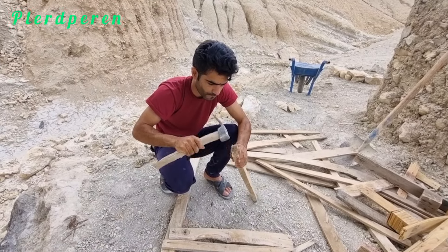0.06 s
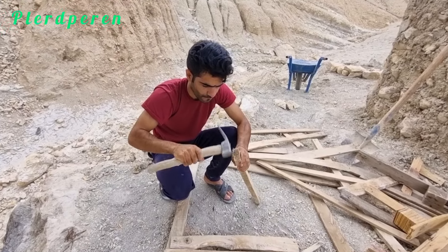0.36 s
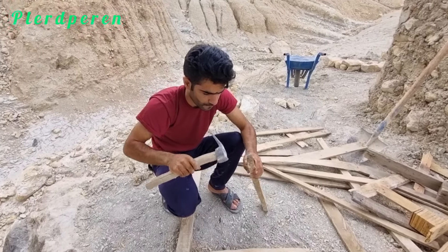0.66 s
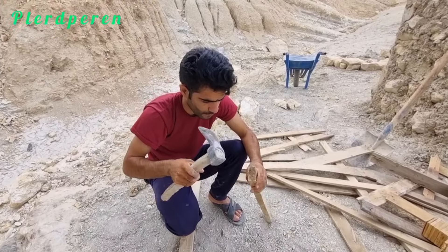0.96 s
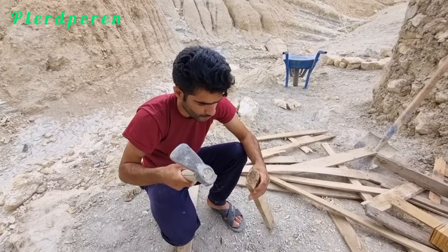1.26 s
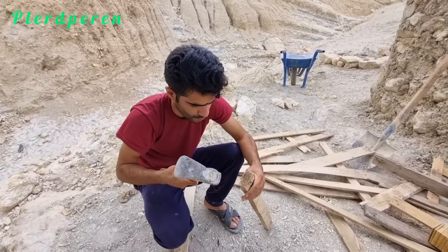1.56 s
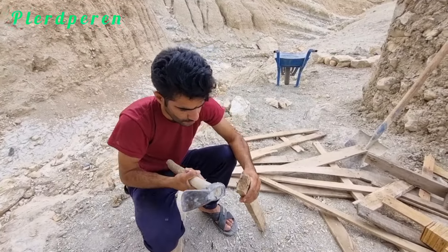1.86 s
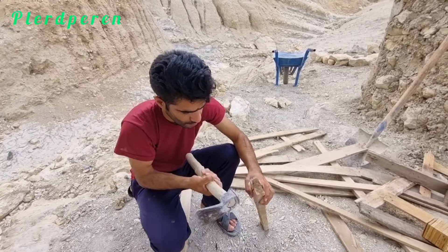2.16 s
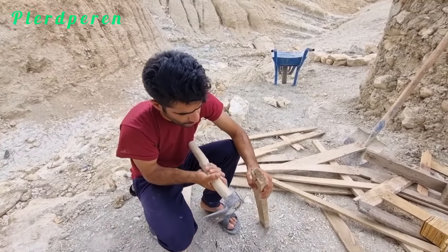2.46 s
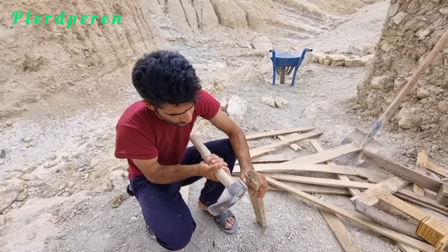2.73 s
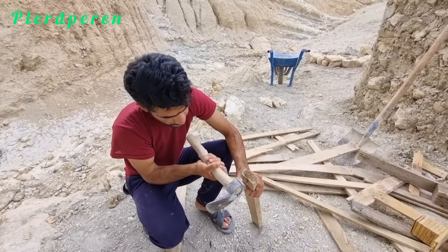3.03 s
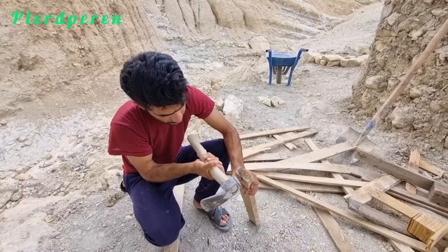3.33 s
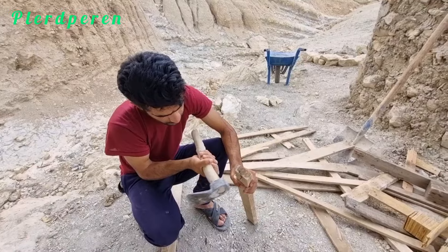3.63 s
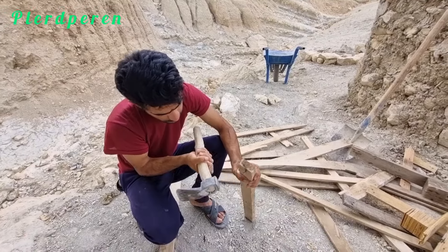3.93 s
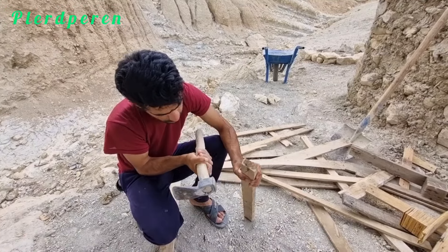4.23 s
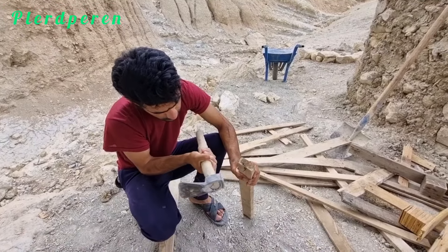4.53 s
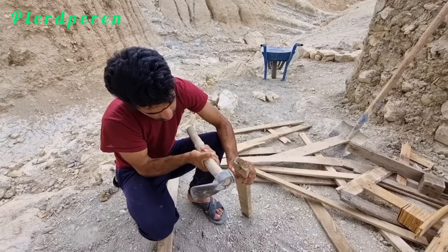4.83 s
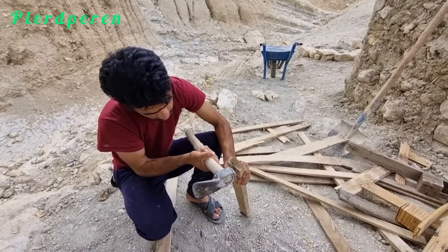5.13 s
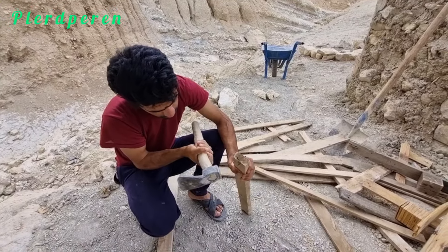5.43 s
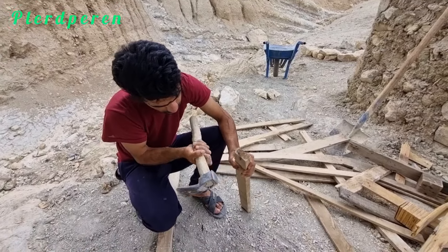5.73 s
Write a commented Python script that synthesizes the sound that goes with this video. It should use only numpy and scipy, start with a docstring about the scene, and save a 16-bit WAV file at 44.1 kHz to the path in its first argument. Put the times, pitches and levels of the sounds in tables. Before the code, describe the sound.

A hatchet chops a wooden stake, once early, then in a steady run of dry knocks, over a faint outdoor breeze.

```python
"""In a dry ravine, about two metres away, a hatchet chops at a wooden stake held upright on stony ground.
The edge bites, fibres crack, the stake rings and thumps into the soil; after some chops it knocks again.
Ground and lumber scatter each blow, chips and grit land, and the slopes return a faint tail.
Wood slides in the hands between blows, and a breeze rumbles under a thin hiss."""
import sys
import numpy as np
from scipy import signal
from scipy.fft import rfft, irfft, next_fast_len
from scipy.io import wavfile

SR = 44100
rng = np.random.default_rng(int(sys.argv[2]) if len(sys.argv) > 2 else 0)


def generate_wav(sig):
    """Save sig (samples, or channels by samples) to the path in sys.argv[1] as 16-bit PCM at SR."""
    pcm = np.round(np.clip(np.atleast_2d(sig).T, -1, 1) * 32767).astype(np.int16)
    wavfile.write(sys.argv[1], SR, pcm)


N = 255339
HIT_SAMPLES = 20000  # one hit with its tail
TIME, AGE = np.arange(N) / SR, np.arange(HIT_SAMPLES) / SR  # seconds into the scene, into a hit


def undb(db):
    """Decibels to gain."""
    return 10 ** (np.asarray(db) / 20)


def unit_rms(x):
    """Scale to rms 1."""
    return x / np.sqrt(np.mean(x ** 2))


def unit_energy(x):
    """Scale to an average energy of 1 per channel."""
    return unit_rms(x) / np.sqrt(x.shape[-1])


def on_log(hz, points):
    """Read (Hz, value) points on a log-frequency axis."""
    point_hz, values = np.transpose(points)
    return np.interp(np.log(np.maximum(hz, 1)), np.log(point_hz), values)


def eq(x, points):
    """Minimum-phase EQ through (Hz, dB) points."""
    size = 2 * next_fast_len(x.shape[-1])
    hz = np.arange(size // 2 + 1) * SR / size
    cepstrum = irfft(np.log(undb(on_log(hz, points))))
    cepstrum[1:size // 2] *= 2
    cepstrum[size // 2 + 1:] = 0
    return irfft(rfft(x, size) * np.exp(rfft(cepstrum)))[..., :x.shape[-1]]


def boost(x, hz, lift_db, width):
    """Peak EQ round one frequency; width is a share of that frequency."""
    return eq(x, [(hz / (1 + width), 0), (hz, lift_db), (hz * (1 + width), 0)])


def band(x, edges_hz, kind="band", order=3):
    """Butterworth filter."""
    return signal.sosfilt(signal.butter(order, edges_hz, kind, fs=SR, output="sos"), x + 1e-18)


def convolve(x, response):
    """Pass a mono hit through a stereo response."""
    return signal.fftconvolve(x[None], response, axes=1)[:, :HIT_SAMPLES]


def delay(x, s):
    """Delay by s seconds."""
    return np.pad(x, (int(s * SR), 0))[:len(x)]


def add(out, s, hit):
    """Mix a hit in at s seconds."""
    start = int(s * SR)
    out[:, start:start + HIT_SAMPLES] += hit[:, :N - start]


def diffuse(size, alike_hz=900):
    """Noise from all round: nearly mono in the bass, wide in the treble."""
    mid, side = rfft(rng.standard_normal((2, size)))
    hz = np.arange(len(mid)) * SR / size
    alike = 0.97 / (1 + (hz / alike_hz) ** 4)
    mid, side = mid * np.sqrt(1 + alike), side * np.sqrt(1 - alike)
    return irfft(np.array([mid + side, mid - side]), size)


def waver(per_s):
    """Slow random wander with a spread near 1."""
    knots = np.arange(0, N / SR + 1, 1 / per_s)
    return np.interp(TIME, knots, rng.standard_normal(len(knots)))


def swell(middle_s, length_s):
    """Smooth rise and fall, above half height for length_s."""
    return np.cos(np.pi / 2 * np.clip((TIME - middle_s) / length_s, -1, 1)) ** 2


# The breeze's bass-heavy tone. Each row: frequency in Hz, gain in dB.
BREEZE_EQ = [(13, -41.5), (22, -22.5), (43, -10), (93, 0.5), (134, -6), (162, -5.5), (196, -14.5),
             (226, -10.5), (322, -20), (360, -24), (487, -29), (787, -42), (1000, -49.5), (1300, -83.5),
             (2200, -120)]
# The fader ride on the breeze. Each row: time in seconds, gain in dB.
BREEZE_RIDE = [(0, -50.5), (0.12, -67.5), (0.25, -50.5), (0.95, -48), (1.25, -52.5), (1.75, -58),
               (2.25, -55), (2.62, -71.5), (2.72, -57), (2.85, -65), (2.98, -48.5), (3.13, -56),
               (3.28, -45.5), (3.55, -49), (3.8, -48.5), (4.3, -54), (4.95, -46.5), (5.79, -56.5)]
# Gusts buffeting the microphones. Each row: middle in seconds, length in seconds, rise in dB.
GUSTS = [(0.411, .06, 11.5), (0.693, 0.071, 8.5), (3.301, .08, 6), (3.786, 0.066, 10.5), (4.02, 0.21, 5),
         (4.55, 0.3, 3.5), (4.871, 0.17, 6), (5.084, 0.074, 11), (5.313, 0.091, 7.5), (5.65, 0.34, 6)]

def breeze(rumble_db=4, rush_db=1.5, flutter_db=2.5, rush_flutter_db=2.18, gust_share=0.44, split_hz=60):
    """Moving air rumbles unevenly under a softer rush; gusts lift mostly the rumble."""
    ride_db = np.interp(TIME, *np.transpose(BREEZE_RIDE))
    gust_db = sum(db * swell(s, length_s) for s, length_s, db in GUSTS)
    air = eq(diffuse(N), BREEZE_EQ)
    bass = unit_rms(band(air, 120, "low"))
    sub = band(bass, split_hz, "low") * undb(flutter_db * waver(9))
    buffet = band(bass, split_hz, "high") * undb(flutter_db * waver(16))
    rumble = (sub + buffet) * undb(rumble_db + gust_db)
    rush = unit_rms(band(air, [130, 620]))
    rush *= undb(rush_db + gust_share * gust_db + rush_flutter_db * waver(25))
    return undb(ride_db) * (rumble + rush)


# The fader ride on the background hiss. Each row: time in seconds, gain in dB.
HISS_RIDE = [(0, -64), (0.14, -80), (0.599, -79), (0.85, -76.5), (1.069, -76.5), (1.4, -79.5),
             (1.95, -82.5), (2.2, -78.5), (2.45, -89.5), (2.9, -86), (3.251, -77.5), (3.701, -72),
             (4.301, -79.5), (4.621, -72.5), (4.9, -67.5), (5.348, -74), (5.79, -72.5)]
# The tone of the hiss, then of the microphones' noise floor. Each row: frequency in Hz, gain in dB.
HISS_EQ = [(600, -5.5), (1000, -5), (1500, -1), (2300, -2.5), (3000, -5), (3700, -6), (4400, -2.5),
           (5200, 2.5), (7000, -5.5), (9000, -11.5), (12000, -10.5), (16000, -14.5)]
FLOOR_EQ = [(500, -2), (3000, -9.5), (7000, -18), (9000, -5.5), (11000, -5.5), (13500, 2.5), (16000, -2)]

def hiss(trim_db=-3.5, floor_db=-79, low_waver_db=2, high_waver_db=1.3, split_hz=3000):
    """A thin hiss swells and fades, highs and lows wavering apart, over steady microphone noise."""
    ride_db = np.interp(TIME, *np.transpose(HISS_RIDE))
    noise = unit_rms(eq(diffuse(N), HISS_EQ))
    highs = band(noise, split_hz, "high") * undb(high_waver_db * waver(9))
    lows = band(noise, split_hz, "low") * undb(low_waver_db * waver(7))
    floor = undb(floor_db) * unit_rms(eq(diffuse(N), FLOOR_EQ))
    return (highs + lows) * undb(ride_db + trim_db) + floor


# Resonances of the rubbed wood. Each row: centre in Hz, width in Hz, gain in dB.
RUBBED_WOOD = [(1490, 180, 1.5), (2210, 180, -12.5), (3130, 120, -8.5)]
# Shifts of grip. Each row: middle in seconds, length in seconds, level in dB.
GRIP_SHIFTS = [(0.038, 0.032, -52.5), (0.59, 0.16, -69), (1.058, 0.14, -71.5), (1.172, 0.081, -71),
               (1.844, .16, -77), (2.171, 0.24, -80), (4.9, 0.58, -74.5)]

def scrapes(grain_db=6, catch_db=6, rasp_db=-15, right_db=-4):
    """Wood slides through the hands, catching unevenly; dense stick-slip grains make it ring."""
    grains = diffuse(N) * undb(grain_db * rng.standard_normal(N) + catch_db * waver(25))
    wood = sum(undb(db) * band(grains, [hz - width / 2, hz + width / 2], order=1)
               for hz, width, db in RUBBED_WOOD)
    rasp = undb(rasp_db) * band(grains, [600, 6000], order=1)
    envelope = sum(undb(db) * swell(s, length_s) for s, length_s, db in GRIP_SHIFTS)
    return unit_rms(wood + rasp) * undb([[0], [right_db]]) * envelope


# Chips and grit landing, and small knocks of the handle.
# Each row: start in seconds, level in dB before the trim, brightness in dB.
CHIPS = [(0.13, -54, 13), (0.501, -44, -32), (0.59, -51, -31), (0.6973, -56, -18), (0.9278, -55, -9),
         (1.2421, -35.5, -24), (1.284, -52, -21), (1.3264, -54.5, -30), (3.6707, -57, -9),
         (5.4222, -60, -6.5)]

def chips(trim_db=13, decay_s=0.0018, tail_db=-21):
    """Tiny impacts give dry ticks, from dull wood to bright grit."""
    out, tail = np.zeros((2, N)), undb(tail_db) * slopes()
    for s, db, bright_db in CHIPS:
        tick = rng.standard_normal(HIT_SAMPLES) * np.exp(-AGE / decay_s)
        tick = eq(tick, [(500, -24), (850, -4.5), (1250, 4.5), (2200, -4), (5000, -11),
                         (9000, bright_db + 3.5), (14000, bright_db - 1.5)])
        placed = convolve(tick, near_paths(scatter_db=-1) + tail)
        add(out, s, undb(db + trim_db) * unit_energy(placed))
    return out


# The phone's body shading its right microphone port. Each row: frequency in Hz, gain in dB.
SHADE_EQ = [(900, -1), (1500, -8.5), (2500, -8), (5000, -15), (9000, -17), (15000, -9)]
# The tone of the early reflections. Each row: frequency in Hz, gain in dB.
SCATTER_EQ = [(500, -11.5), (1200, -2.5), (1700, -13), (2500, -0.5), (5500, -1), (8000, -3.5),
              (13000, -4.5)]

def near_paths(scatter_db, rise_s=0.0007, decay_s=0.011, right_lag_samples=6):
    """Direct sound, reaching the left port first, and dense scatter off stones and lumber."""
    left = signal.unit_impulse(HIT_SAMPLES)
    right = eq(signal.unit_impulse(HIT_SAMPLES, right_lag_samples), SHADE_EQ)
    scatter = diffuse(HIT_SAMPLES, alike_hz=1500) * np.exp(-AGE / decay_s) * (1 - np.exp(-AGE / rise_s))
    return np.array([left, right]) + undb(scatter_db) * eq(unit_energy(scatter), SCATTER_EQ)


# The ravine's reverb time. Each row: frequency in Hz, seconds to fall 60 dB.
RAVINE_DECAY = [(300, 0.1), (900, 0.32), (1600, 0.24), (2500, 0.3), (5000, 0.11), (8000, 0.22),
                (15000, 0.17)]

def slopes(rise_s=0.081):
    """The ravine walls return a short tail that blooms and hangs longest in the mids."""
    noise = diffuse(HIT_SAMPLES)
    edges_hz = np.geomspace(150, 19200, 8)
    tail = np.zeros_like(noise)
    for low, high in zip(edges_hz, edges_hz[1:]):
        t60 = on_log(np.sqrt(low * high), RAVINE_DECAY)
        tail += band(noise, [low, high]) * undb(-60 * AGE / t60)
    tail *= 1 - np.exp(-AGE / rise_s)
    tone = [(400, 4), (1100, -16), (1550, -7.5), (1900, -3.5), (2350, 0), (2800, -2.5),
            (3300, 4), (3900, -3.5), (5000, 1.5), (8000, 0), (14000, 1)]
    return unit_energy(eq(tail, tone))


def ring(modes, detune, spread_db=2.43):
    """Struck modes die away; each blow lands elsewhere, so their balance and tuning vary a little."""
    hz, db, t60 = np.transpose(modes)[:, :, None]
    weight, shift = rng.standard_normal((2, len(modes), 1))
    polarity = (-1) ** np.arange(len(modes))[:, None]
    envelopes = undb(db + spread_db * weight - 60 * AGE / t60)
    waves = polarity * np.sin(2 * np.pi * hz * (1 + detune * shift) * AGE)
    return unit_energy((envelopes * waves).sum(0))


# The tone of cracking fibres. Each row: frequency in Hz, gain in dB.
FIBRE_EQ = [(200, -18), (700, -13.5), (1500, 5), (3000, 0.5), (3800, -2.5), (4600, -1.5), (5600, 2),
            (6800, -9.5), (8000, -6.5), (9300, -15), (11000, -11), (13500, -8), (16000, -20)]

def fibres(db, bite_db, firm_db=-21.5, firm_tear_s=0.0025, growth_per_db=0.2, top_hz=6800):
    """Fibres give way: returns a run of snaps, longer in a harder blow, and a single sharp crack."""
    tear_s = firm_tear_s * np.exp(growth_per_db * (db - firm_db))
    snaps = rng.standard_normal(HIT_SAMPLES) * undb(6 * rng.standard_normal(HIT_SAMPLES))
    snaps *= np.exp(-AGE / tear_s)
    return [undb(bite_db) * band(unit_energy(eq(push, FIBRE_EQ)), top_hz, "low")
            for push in (snaps, signal.unit_impulse(HIT_SAMPLES))]


def edge_tick(decay_s=0.0024):
    """The edge meets the fibres with a tick of top end."""
    noise = rng.standard_normal(HIT_SAMPLES) * np.exp(-AGE / decay_s)
    return unit_energy(band(eq(noise, FIBRE_EQ), 8000, "high"))


# Modes of the hand-damped stake with the blade in it, then of its foot on packed soil.
# Each row: pitch in Hz, relative level in dB, seconds to fall 60 dB.
STAKE_MODES = [(810, -2.5, 0.027), (950, -5, 0.016), (1133, -0.5, 0.014), (1305, -9, 0.055),
               (1521, 10, 0.027), (1611, 9, 0.02), (1902, -5, 0.022), (2227, -8.5, 0.06),
               (2453.4, -3.5, 0.03), (3114, -2.5, 0.02), (3353, -10.5, 0.034), (4180, -11, 0.035),
               (4660, -10, 0.01), (5183, -13.5, 0.04), (5490, -13.5, 0.024), (8050, -19, 0.015)]
SOIL_MODES = [(162, -7.5, 0.087), (247, 1.5, 0.032), (365, 1, 0.022), (502, -2.5, 0.034)]

def chop(db, thud_db, bite_db, edge_db, spill_db, tear_db=-1, wedge_db=-1.5, usual_bite_db=-8.5):
    """The edge ticks in, fibres tear, the wedge rings the stake and drives its foot into the soil."""
    tearing, crack = fibres(db, bite_db)
    edge = undb(edge_db) * edge_tick()
    # the blade stops dead as it wedges: one sharp crack, and the stake rings from that moment
    stake = ring(STAKE_MODES, detune=0.01) + undb(wedge_db) * crack
    thud = undb(thud_db) * ring(SOIL_MODES, detune=0.006)
    body = delay(stake, 0.0022) + delay(thud, 0.004)
    contact = edge + undb(tear_db) * delay(tearing, 0.001) + body
    near = unit_energy(convolve(contact, near_paths(spill_db))) * np.linalg.norm(contact)
    # the slopes gather the crack from all directions, and return more of a blow that spills more
    send = 0.5 * body + 1.4 * crack + 0.68 * edge
    far = undb(-18.5 + 0.27 * spill_db) * convolve(send, slopes())
    treble_db = 0.43 * (bite_db - usual_bite_db)  # a deeper bite is brighter
    gain = undb(db) * np.sqrt(0.012 * SR)  # unit energy plays at db rms over 12 ms
    return gain * eq(near + far, [(2200, 0), (5000, treble_db), (9000, 0)])


# The hatchet blows. Each row: start in seconds, gain in dB, then soil thud, fibre bite and edge tick
# in dB relative to it, knock pitch in Hz, knock boost in dB, spill into the surroundings in dB.
BLOWS = [(0.401, -37, 6.5, -7.5, -8.5, 721, 14, 11), (0.422, -28, -5.5, -10.5, -12.5, 850, 10.7, 0.5),
         (2.689, -27, -17.5, -9, -23, 1042, 18.2, -2.5), (3.017, -21, -16, -8.5, -23, 1020, 12, 2),
         (3.349, -19.5, -13, -3.5, -18, 1038, 4.3, -1.5), (3.699, -22.5, -14, 0.5, -17, 805, 9, 0.5),
         (4.051, -24.5, -13.5, -0.5, -8.5, 984, 5.5, -1.5), (4.414, -23.5, -9, -7.5, -8.5, 1093, 8.5, 0.5),
         (4.769, -32.5, -0.5, -11, -12, 1029, 18.5, -3.5), (5.124, -21.5, -20, -4.5, -9, 797, 2.6, -1.5),
         (5.526, -23.5, -17.5, -7, -11.5, 804, 2.04, 1)]
# Blunt second knocks as the stake springs back on the blade. Each row: start in seconds, gain in dB.
REBOUNDS = [(2.707, -32.5), (3.038, -23.5), (3.366, -23), (3.712, -29), (4.794, -38)]

def hatchet():
    """Early blows, then a run about three a second; the point of impact favours one knock pitch."""
    out = np.zeros((2, N))
    for s, db, thud_db, bite_db, edge_db, knock_hz, knock_db, spill_db in BLOWS:
        blow = chop(db, thud_db, bite_db, edge_db, spill_db)
        add(out, s, boost(blow, knock_hz, knock_db, width=0.35))
    for s, db in REBOUNDS:
        knock = chop(db, thud_db=-21, bite_db=-14, edge_db=-32.5, spill_db=-7)
        add(out, s, boost(knock, hz=990, lift_db=6, width=0.25))
    # long waves reach both ports alike, so the low end narrows
    side = (out[0] - out[1]) / 2
    side -= 0.9 * signal.sosfiltfilt(signal.butter(2, 900, fs=SR, output="sos"), side)
    return out.mean(0) + np.array([side, -side])


def scene():
    """Chops, falling chips and shifts of grip over a bed of breeze and hiss."""
    return hatchet() + chips() + scrapes() + breeze() + hiss()


# Cavity resonances of the right microphone port. Each row: frequency in Hz, gain in dB.
RIGHT_PORT_EQ = [(100, -1.56), (400, -0.5), (950, 4), (1520, 4), (1850, 9), (2400, 11.5), (3100, 9),
                 (4200, 15), (5150, 13.5), (5900, 8), (7000, 7), (9000, -2), (13000, 6)]

def record(dry, ceiling=0.85, top_hz=15900):
    """The right port adds its resonances; the phone clips at its ceiling and cuts the top."""
    ports = np.array([dry[0], eq(dry[1], RIGHT_PORT_EQ)])
    high_cut = signal.ellip(8, 0.2, 70, top_hz, fs=SR, output="sos")
    return signal.sosfilt(high_cut, np.clip(ports, -ceiling, ceiling))


dry = scene()
out = record(dry)
generate_wav(out)
```